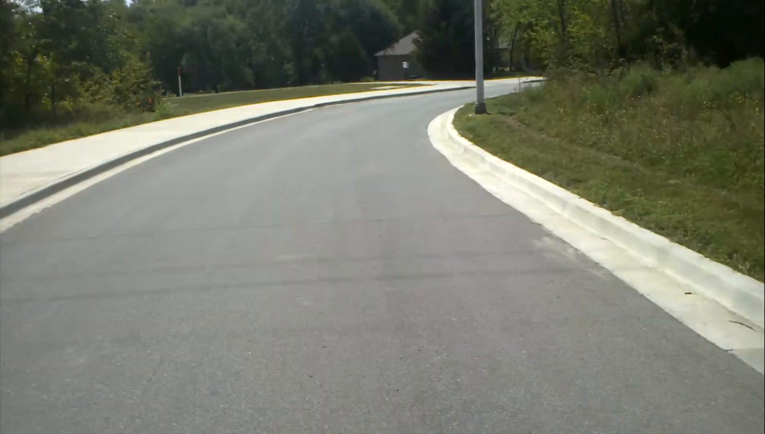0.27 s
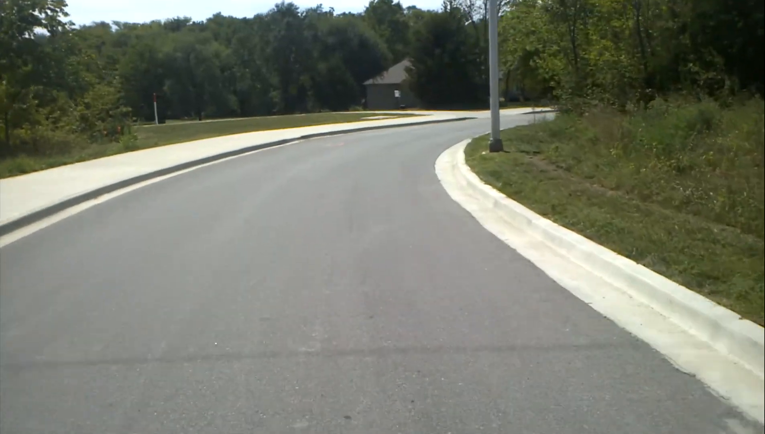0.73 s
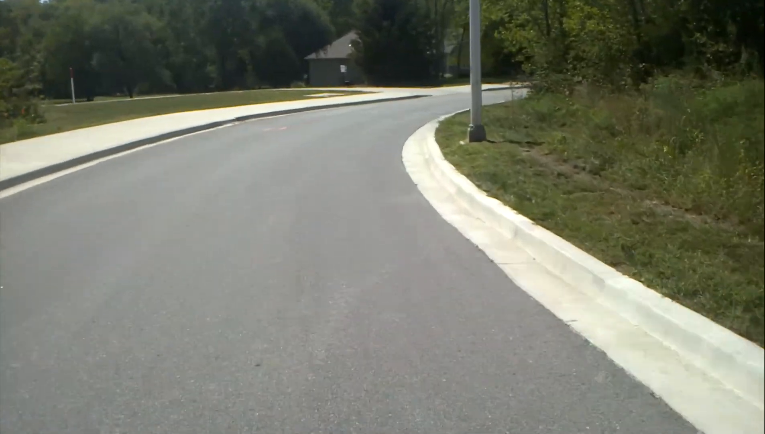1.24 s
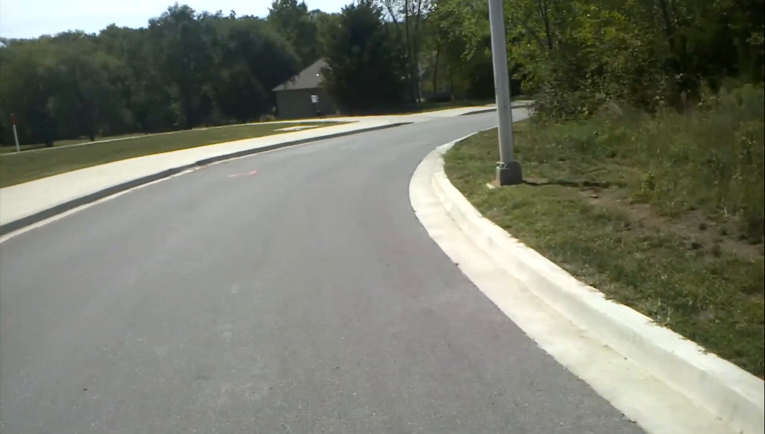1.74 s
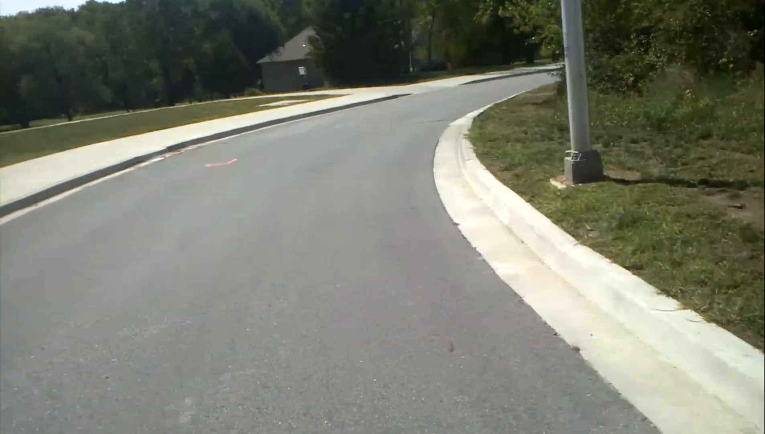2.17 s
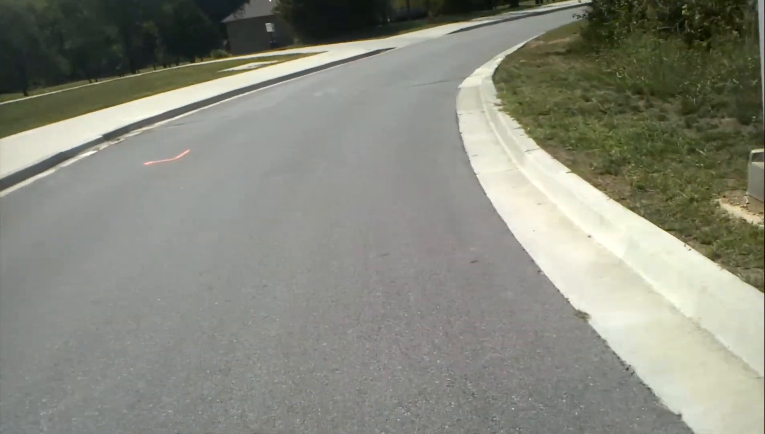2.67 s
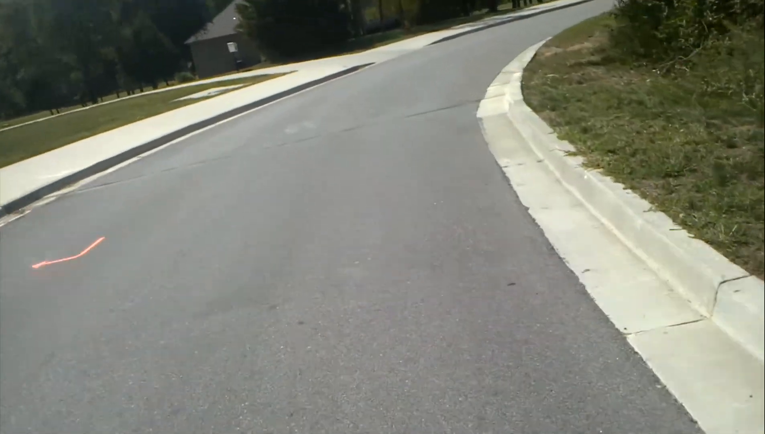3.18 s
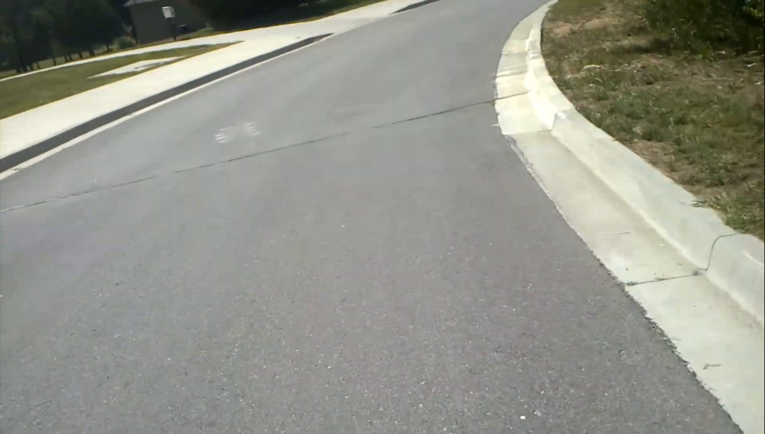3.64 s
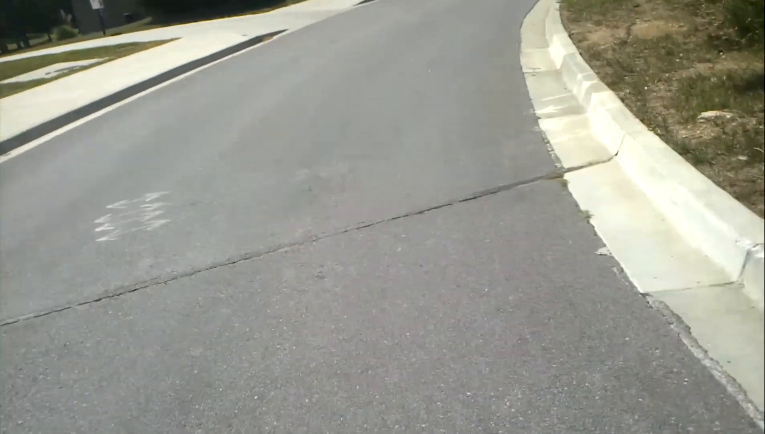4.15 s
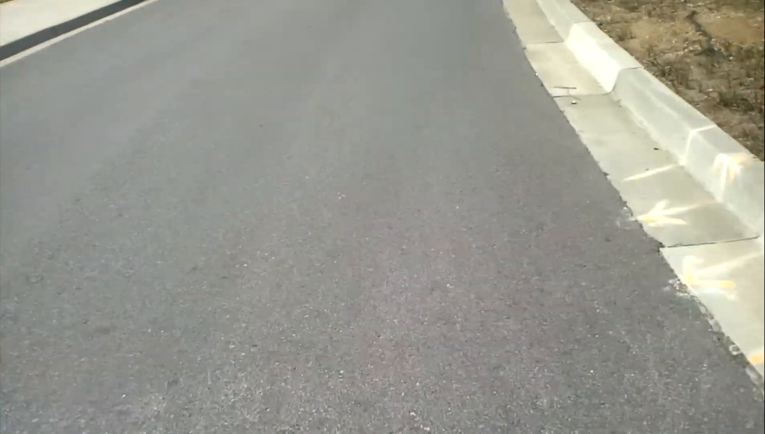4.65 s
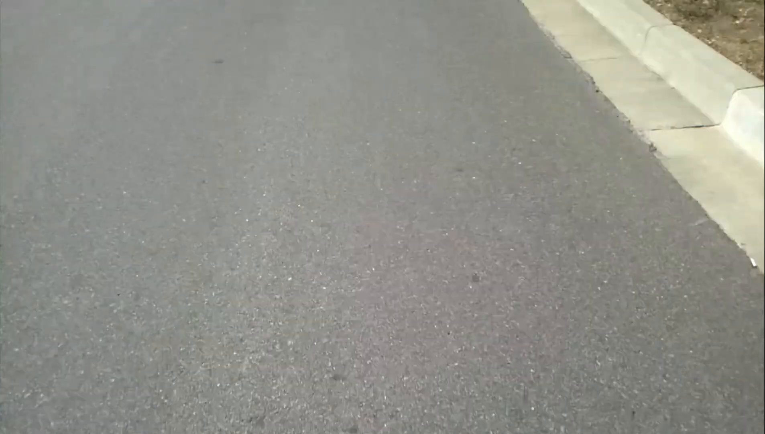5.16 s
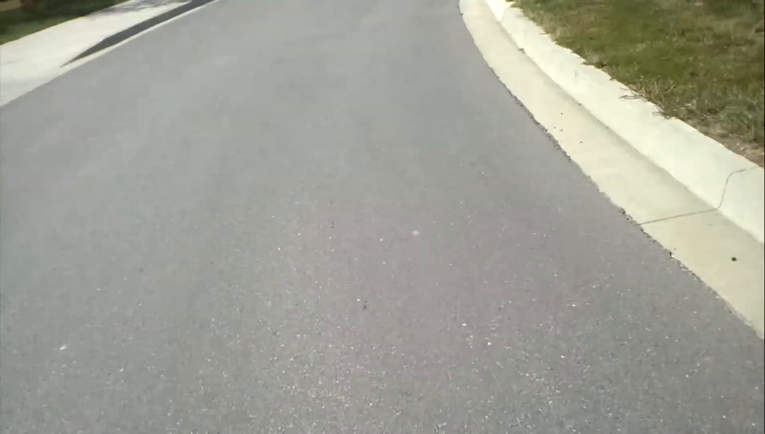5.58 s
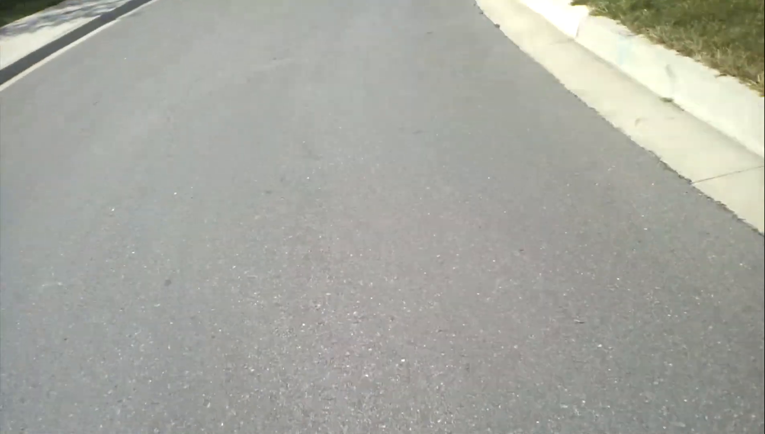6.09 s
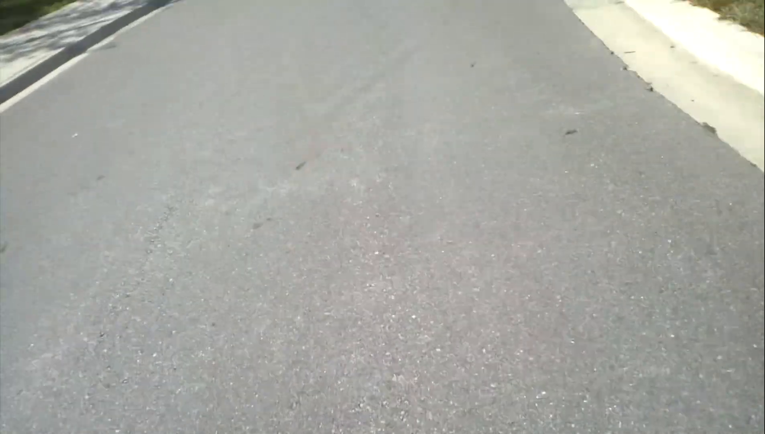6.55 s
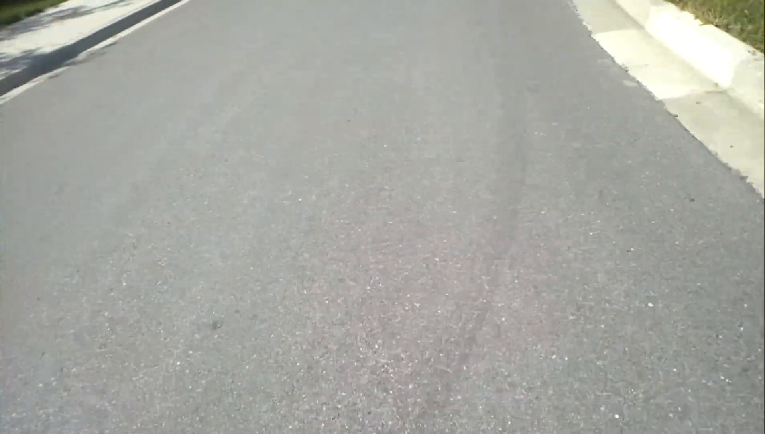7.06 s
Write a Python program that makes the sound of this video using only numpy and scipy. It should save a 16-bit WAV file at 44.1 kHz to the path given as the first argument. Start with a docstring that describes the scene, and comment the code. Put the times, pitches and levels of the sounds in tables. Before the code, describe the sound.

Outdoors, close to the rider's microphone, gusty wind dominates with bassy buffets and ragged pops. Beneath it hard wheels hum and roar on asphalt, growing slightly louder. Thin crickets and raspy katydids sing along the grassy verge, some sliding past with falling pitch. A double scrunch over a pavement joint comes after five seconds, before calmer wind and clearer rolling.

```python
"""An asphalt road past a grassy verge: a longboard rolls fast, heard by its rider.
Wind rumbles, flutters and pops at the microphone: filtered noise and showers of eddy pulses.
Wheels roar and ring as coloured noise; they cross a joint, swish over coarse patches and snap grit.
Insects sing in the grass: noise bands for the far chorus, rasping noise for katydids,
and sine tones for crickets, some sliding by with falling pitch."""
import sys
import numpy as np
from scipy import signal
from scipy.fft import rfft, irfft
from scipy.io import wavfile
from scipy.ndimage import uniform_filter1d

SR = 44100
rng = np.random.default_rng(int(sys.argv[2]) if len(sys.argv) > 2 else 0)


def wav_out(sig):
    """Save sig, one row per channel (or a flat mono array), as 16-bit PCM at SR to the path in sys.argv[1]."""
    wavfile.write(sys.argv[1], SR, np.round(np.clip(np.atleast_2d(sig).T, -1, 1) * 32767).astype(np.int16))


N = 322812
T = np.arange(N) / SR  # s


def amp(db):
    """Decibels to gain."""
    return 10 ** (np.asarray(db) / 20)


def unit(x):
    """Scales to rms 1."""
    return x / np.sqrt(np.mean(x ** 2) + 1e-20)


def follow(rows):
    """The columns of a curve table, interpolated to every sample."""
    s, *columns = np.transpose(rows)
    return [np.interp(T, s, c) for c in columns]


def colour(points):
    """Gain of a (Hz, dB) spectrum at every FFT bin, interpolated over log frequency."""
    f, db = np.transpose(points)
    log_bins = np.log(np.fft.rfftfreq(N, 1 / SR) + 1)
    return amp(np.interp(log_bins, np.log(f), db))


def noise(gain):
    """Noise of rms 1 with the given gain per bin."""
    white = rng.standard_normal(N)
    return unit(irfft(rfft(white) * gain, N))


def wander(hz):
    """Random drift of rms 1, with a Gaussian roll-off of scale hz."""
    return noise(np.exp(-(np.fft.rfftfreq(N, 1 / SR) / hz) ** 2))


def bell(s, half):
    """Bell envelope of height 1 centred on s."""
    return np.exp(-.5 * np.minimum(((T - s) / half) ** 2, 100))


def swells(rows):
    """A bell for each row (s, dB, half length s)."""
    return sum(amp(db) * bell(s, half) for s, db, half in rows)


def add(mix, s, sound):
    """Mixes a sound in, centred on s, or from time 0 if it would begin earlier."""
    first = max(round(s * SR) - len(sound) // 2, 0)
    part = mix[first:][:len(sound)]
    part += sound[:len(part)]


def eddy(t, hz):
    """Pressure of a vortex passing at t = 0: a push, then suction; peak 1, strongest at hz."""
    u = np.clip(2 * np.pi * hz * t, -10, 10)
    return -u * np.exp(.5 * (1 - u ** 2))


def shower(hz, per_s):
    """Eddies of one size arriving at random; rms 1."""
    arrivals = rng.standard_normal(N) * (rng.random(N) < per_s / SR)
    pulse = eddy(np.arange(-500, 501) / SR, hz)
    return unit(signal.oaconvolve(arrivals, pulse, "same"))


def steadied(x):
    """Divides by the running rms over 79 ms: slow swells even out, fast flutter stays."""
    return x / np.sqrt(uniform_filter1d(x ** 2, size=3500) + 1e-3)


def wind_strength():
    """Airstream plus gusts and lulls in dB, for the large eddies and for the small ones."""
    # Each row: time in seconds, strength in dB.
    airstream = [(0.0, 4.5), (0.5, 1), (1.35, -1), (2.3, 1.5), (3.2, -0.5), (3.85, 0.5), (4.25, -1.5),
                 (4.7, 5.5), (5.2, 4), (5.7, 1.5), (6.1, -7.5), (6.65, -7), (7.32, -13)]
    # Each row: time in seconds, change for large eddies in dB, for small eddies in dB, half length in seconds.
    gusts = [(0.114, -12, -6.5, 0.029), (0.26, 1.5, 6.5, 0.075), (0.381, 2.5, 4, 0.026),
             (0.558, 0, -3, .03), (0.757, 7, 5.5, 0.023), (0.876, 8, 6.5, 0.055), (1.457, -1, -5.5, 0.036),
             (1.61, -0.5, 3, .035), (1.844, -1.5, 3, 0.063), (2.014, 6, 10.5, 0.03), (2.123, 4.5, -4, .035),
             (2.563, 5.5, 5, 0.043), (3.143, 4.5, 3.5, 0.043), (3.808, -5, -4.5, 0.045),
             (4.003, -1, 4.5, 0.015), (4.267, -3.5, -9, 0.021), (4.392, 9, 7, 0.018), (5.63, 2.5, 8, 0.03),
             (5.903, 0, 10, 0.022), (6.302, 8.5, 7, 0.037), (6.81, -2, 12, 0.04)]
    stream_db, = follow(airstream)
    gust_db = sum(np.outer((large_db, small_db), bell(s, half)) for s, large_db, small_db, half in gusts)
    return stream_db + gust_db


def rumble(wind_db, level_db=-20.5, response=0.87, lump_db=1.65, lump_hz=13):
    """Large, slow eddies merge into a low, lumpy rumble."""
    # Rumble spectrum. Each row: frequency in Hz, gain in dB.
    spectrum = [(12, -9.5), (25, -1), (45, -1), (70, 0), (100, -4.5), (150, -10.5), (250, -31),
                (500, -65.5)]
    loudness_db = level_db + response * wind_db + lump_db * wander(lump_hz)
    return amp(loudness_db) * steadied(noise(colour(spectrum)))


def flutter(wind_db, level_db=-25, tilt_db=-13.0, brighten=0.29, per_cycle=1.2, clump_db=2.0,
            low_hz=140, high_hz=430, lump_db=2.0, lump_hz=12):
    """Showers of smaller eddies; the harder the gust, the more the smallest ones gain."""
    gust_db = wind_db + lump_db * wander(lump_hz)
    slope_db = tilt_db + brighten * gust_db  # per octave
    air = 0
    for hz in np.geomspace(low_hz, high_hz, num=5):
        octaves = np.log2(hz / low_hz)
        air = air + shower(hz, per_cycle * hz) * amp(slope_db * octaves)
    clumped = air * amp(clump_db * wander(37))
    return amp(level_db + gust_db) * steadied(clumped)


def spatter(wind_db, level_db=-45, response=1.17, coarse_hz=480, fine_hz=760, fine_db=-5, per_s=700,
            clump_db=3, lump_db=3.0, lump_hz=7, pop_db=-2, pop_hz=420, pops_per_s=22):
    """Tiny eddies tear at the port in ragged clumps when the wind is strong; stray larger ones pop softly."""
    # Spatter relative to the airstream. Each row: time in seconds, level in dB.
    balance = [(0.0, 2.5), (0.35, -9), (0.6, -9), (1.35, -12), (1.6, 2), (1.9, 1.5), (2.3, -4), (3.2, 4),
               (4.0, 2.5), (4.7, -1), (5.2, 1), (7.32, -9.5)]
    tiny = shower(coarse_hz, per_s) + amp(fine_db) * shower(fine_hz, per_s)
    clumped = steadied(tiny * amp(clump_db * wander(43)))
    air = amp(lump_db * wander(lump_hz)) * clumped + amp(pop_db) * shower(pop_hz, pops_per_s)
    return amp(level_db + follow(balance)[0] + response * wind_db) * air


def buffets(snap_db=0, thump_db=-4, push=0.17, thump_hz=200, steepen_db=-15, steepen_hz=1000, edge=3.5,
            crack_db=-16, crack_hz=6000):
    """A strong eddy pops: a tight core, pushing more than it sucks, inside a broader swirl."""
    # Strong eddies. Each row: time in seconds, snap in dB, snap pitch in Hz, thump before trim in dB.
    strong_eddies = [(0.1778, -15, 330, -7), (0.2072, -18, 570, -30), (0.217, -20, 480, -3),
                     (0.2883, -14.5, 440, -18), (0.351, -19.5, 580, -31), (0.3825, -24, 330, -4.5),
                     (0.4236, -16, 466, -4), (0.4771, -17.5, 410, -10.5), (1.652, -22, 380, -9),
                     (1.8186, -12, 790, -8), (1.9797, -19, 420, -25), (2.0141, -18, 810, -10),
                     (2.033, -14.5, 910, -5), (2.5607, -9, 440, -18), (2.5852, -13, 483, -7),
                     (2.7114, -15.5, 440, -8), (3.2891, -16.5, 534, -9), (4.159, -17, 420, -16),
                     (4.3946, -23, 390, -17), (4.544, -15, 730, -11), (4.5548, -9, 610, -12),
                     (4.8375, -13, 745, -5), (4.8988, -17, 370, -10), (4.9315, -5.5, 520, -13),
                     (4.997, -10, 474, -24), (5.0127, -7, 1000, -1.5), (5.0231, -15, 700, -22),
                     (5.036, -11.5, 630, -22), (5.1256, -14, 690, -16), (5.1582, -9, 543, -14.5),
                     (5.1953, -16, 420, -3), (5.2223, -11.5, 450, -28), (5.5766, -7.5, 540, -33),
                     (5.6047, -2, 485, -22), (5.6108, -7.5, 437, -11), (5.6306, -10, 410, -18),
                     (5.636, -13, 440, -9), (5.7135, -6.5, 345, -12), (6.0225, -12.5, 427, -11)]
    t, out = np.arange(-600, 601) / SR, np.zeros(N)
    for s, db, hz, swirl_db in strong_eddies:
        core = eddy(t, hz) + push * np.exp(-.5 * (2 * np.pi * hz * t) ** 2)
        crack = amp(steepen_db) * eddy(t, edge * hz) + amp(crack_db) * eddy(t, crack_hz)
        core += amp(db) * (hz / steepen_hz) ** 4 * crack  # the hardest, tightest ones steepen into a crack
        swirl = amp(swirl_db + thump_db) * eddy(t, thump_hz)
        add(out, s, amp(db + snap_db) * core + swirl)
    return out


def wheel_ring(ring_hz=1806, width_hz=156, peak_db=-3):
    """The broad resonance of a hard wheel, as a gain per bin."""
    hz = np.fft.rfftfreq(N, 1 / SR)
    return amp(peak_db) / np.hypot(1, 2 * (hz - ring_hz) / width_hz) ** 2


def wheels(level_db=16, grain_db=1.0, turn_hz=33, turn_depth=0.032):
    """The grain of the asphalt shakes deck and wheels, a little harder once each turn."""
    # Louder as the board gathers speed. Each row: time in seconds, level before trim in dB.
    roll = [(0.0, -51.5), (1.0, -51.5), (2.1, -50.5), (4.1, -50.5), (7.32, -48)]
    # Roll spectrum. Each row: frequency in Hz, gain in dB.
    spectrum = [(60, 11), (200, 9), (320, 10), (420, 14.5), (490, 12.5), (570, 14.5), (740, -6),
                (1020, 2.5), (1300, -6), (1550, -8), (1950, -5.5), (2300, -13), (2750, -24.5), (5000, -29)]
    turns = np.cumsum(turn_hz * (1 + 0.0425 * wander(1.7))) / SR
    turning = 1 + turn_depth * np.sin(2 * np.pi * turns)
    loudness_db = level_db + follow(roll)[0] + grain_db * wander(50)
    return amp(loudness_db) * turning * noise(colour(spectrum) + wheel_ring())


def chorus(low_db=3.5, high_db=.8, sizzle_db=1, shimmer_db=0.68):
    """Countless far insects blur into three shimmering bands of noise."""
    # Each row: time in seconds, then low voices, high voices and fine sizzle before trim in dB.
    levels = [(0.0, -53.5, -51, -52), (0.6, -57, -51.5, -53), (1.6, -55.5, -51.5, -53),
              (2.05, -56.5, -57, -53), (2.7, -54, -53.5, -51), (3.65, -53, -54.5, -56),
              (4.45, -54.5, -51.5, -53), (5.45, -53.5, -51, -58), (5.75, -56.5, -53.5, -61),
              (6.3, -54, -52, -61), (7.32, -54, -53.7, -61)]
    # Spectra of the three bands. Each row: frequency in Hz, gain in dB.
    low_voices = [(2000, -8.5), (2800, -6.5), (3300, -1.5), (3900, -2), (4400, -3), (5500, -1.5),
                  (6700, 0.5), (7600, 1), (8700, -4), (9500, -18), (12000, -44)]
    high_voices = [(8000, -45), (9000, -2.5), (9500, 3), (10100, 5), (11200, 3), (12000, 0), (12800, -17),
                   (16000, -25)]
    sizzle = [(8000, -26), (11000, -11), (12800, -3.5), (14300, -7), (15800, -9)]
    voices = zip(follow(levels), (low_db, high_db, sizzle_db), (low_voices, high_voices, sizzle))
    return sum(amp(db + trim + shimmer_db * wander(50)) * noise(colour(band)) for db, trim, band in voices)


def chirps(level_db=0.0, half_s=0.022, width_hz=130):
    """Brief, narrow rasps from crickets close to the kerb: tone bursts roughened by fast drift."""
    # Each row: time in seconds, level in dB, pitch in Hz.
    calls = [(.04, -53, 10300), (.25, -60, 10200), (.39, -55, 9400), (.56, -53, 9600), (.71, -50, 9600),
             (.97, -51, 9550), (1.22, -51, 10040), (1.44, -53, 9900), (1.71, -54, 10550), (1.87, -55, 8830),
             (1.93, -53, 10550), (2.16, -52, 10520), (2.47, -55, 9900), (2.9, -52, 9780), (3.12, -52, 9780),
             (3.45, -56, 9760), (3.7, -58, 9750), (3.95, -62, 9700), (4.67, -55, 9550), (5.61, -52, 9560),
             (5.88, -55, 9520)]
    t, out = np.arange(-4000, 4001) / SR, np.zeros(N)
    for s, db, hz in calls:
        envelope = np.exp(-.5 * (t / half_s) ** 2)
        tone = np.sqrt(2) * np.sin(2 * np.pi * hz * t)
        add(out, s, amp(db + level_db) * envelope * tone)
    return out * wander(width_hz)


def trill(s, db, hz, half, stroke_hz, doppler=.007, sag_hz=45, waver_hz=42, uneven_db=2.5, drift=0.0385):
    """Each closing of a cricket's wings sounds a short, sagging tone; the trill swells and sinks in passing."""
    stroke = np.cumsum(stroke_hz * (1 + drift * wander(7.3))) / SR % 1
    passing_hz = hz * (1 - doppler * np.tanh((T - s) / half))  # raised on approach, lowered behind
    pitch = passing_hz + sag_hz * (1 - 2 * stroke) + waver_hz * wander(94)
    pulses = amp(uneven_db * wander(18)) * np.sin(np.pi * stroke) ** 2
    tones = pulses * np.sin(2 * np.pi * np.cumsum(pitch) / SR)
    return amp(db) * bell(s, half) * unit(tones)


def passing_crickets():
    """Trilling crickets slide by, each loudest when nearest."""
    # Each row: time when nearest in seconds, level in dB, pitch in Hz, half length in seconds, wing strokes in Hz.
    singers = [(0.55, -61.5, 8080, .8, 27.4), (4.68, -53.5, 8150, .62, 27.4), (5.329, -57, 7500, .35, 25.9)]
    return sum(trill(*row) for row in singers)


def road_marks(ring_db=8):
    """Coarse patches swish, rough places scrunch and ring the wheels; bright snaps sound as of grit."""
    # Rough asphalt and, front then rear, the joint.
    # Each row: time in seconds, level in dB, half length in seconds, wheel ring in Hz.
    joint = [(.213, -33, 0.011, 2000), (5.078, -28, 0.012, 1770), (5.194, -24, 0.009, 2110),
             (5.28, -37, 0.032, 1780)]
    # Swishes and grit snaps. Each row: time in seconds, level in dB, half length in seconds.
    swishes = [(.085, -42, 0.025), (1.61, -41, .035), (1.86, -41, .035), (4.408, -36, .008)]
    grit = [(2.657, -32, .0013), (2.665, -45, 0.0011)]
    # Spectra. Each row: frequency in Hz, gain in dB.
    joint_spectrum = [(150, -30), (500, 15.5), (1200, 1), (1900, -12.5), (2800, -16), (4000, -14),
                      (6000, -23), (10000, -19), (16000, -27)]
    swish_spectrum = [(300, -25), (700, -2), (1150, -1), (1600, -9), (2600, -20), (6000, -45)]
    grit_spectrum = [(2000, -25), (3400, 2), (5000, 3), (7000, -2), (9000, -4), (11500, 4), (16000, -6)]
    scrunch = 0
    for s, db, half, hz in joint:
        ringing = colour(joint_spectrum) + amp(ring_db) * wheel_ring(hz)
        scrunch = scrunch + amp(db) * bell(s, half) * noise(ringing)
    swish = swells(swishes) * noise(colour(swish_spectrum))
    snaps = swells(grit) * noise(colour(grit_spectrum))
    return scrunch + swish + snaps


def katydids(level_db=-1, rise_s=.27, wing_hz=46.5, stroke_db=7, grain_db=2.0, uneven_db=1):
    """A file scraped by the wing: a grainy rasp with each stroke, in long buzzes and single ticks."""
    # Each row: start in seconds, end in seconds, level before trim in dB, release in seconds.
    buzzes = [(1.98, 3.0, -49, .3), (3.97, 4.832, -46, 0.072)]
    # Each row: time in seconds, level in dB, half length in seconds.
    ticks = [(.52, -48, .006), (1.86, -42, .005), (1.922, -44, .006), (3.02, -52, .006), (3.105, -50, .007),
             (3.715, -48, .008), (3.795, -43, .007), (3.885, -50, .007)]
    # Rasp spectrum. Each row: frequency in Hz, gain in dB.
    spectrum = [(7000, -23), (10000, -10), (12200, -5.5), (13400, -4), (14400, 0), (15800, -14)]
    effort = 0
    for start, end, db, release in buzzes:
        ramps = np.minimum((T - start) / rise_s, (end - T) / release)
        effort = effort + amp(db) * np.clip(ramps, 0, 1)
    strokes = np.cumsum(wing_hz * (1 + 0.0246 * wander(3.8))) / SR
    scraping = unit(amp(stroke_db * np.sin(2 * np.pi * strokes)))
    buzz = amp(level_db + uneven_db * wander(8)) * effort * scraping
    rasp = unit(noise(colour(spectrum)) * amp(grain_db * wander(400)))
    return (buzz + swells(ticks)) * rasp


def scene():
    """Wind, board and insects at one microphone."""
    large_db, small_db = wind_strength()
    wind = rumble(large_db) + flutter(small_db) + spatter(small_db) + buffets()
    insects = chorus() + chirps() + passing_crickets() + katydids()
    return (wind + wheels() + road_marks() + insects)[None]


def record(dry, ceiling=0.93, edge_hz=15750):
    """The microphone passes no steady pressure; its input clips at the ceiling; a low-pass limits the band."""
    coupled = signal.lfilter(*signal.butter(1, 5, "highpass", fs=SR), dry)
    fade = np.minimum(np.minimum(T, T[-1] - T) / .004, 1)  # 4 ms at each end
    clipped = fade * np.clip(coupled, -ceiling, ceiling)
    lowpass = signal.firwin(801, edge_hz, window=("kaiser", 9), fs=SR)
    return signal.oaconvolve(clipped, lowpass[None], "same")


dry = scene()
out = record(dry)
wav_out(out)
```